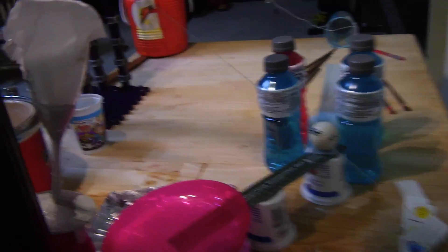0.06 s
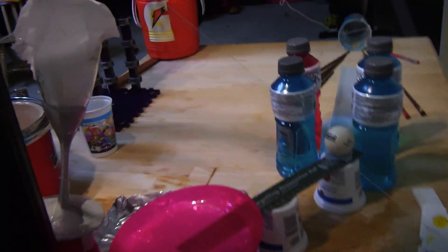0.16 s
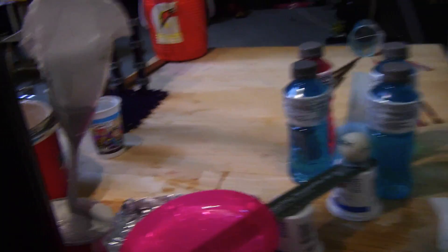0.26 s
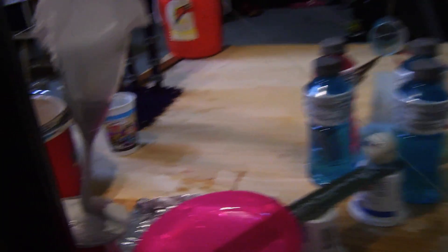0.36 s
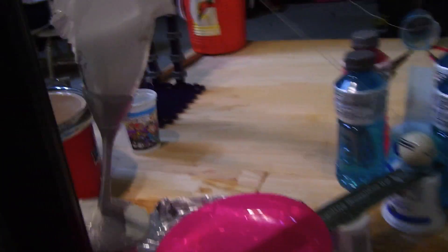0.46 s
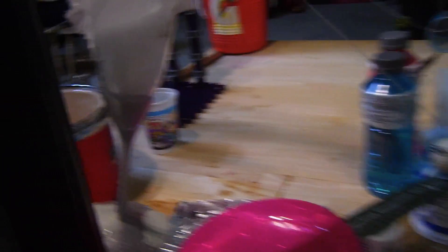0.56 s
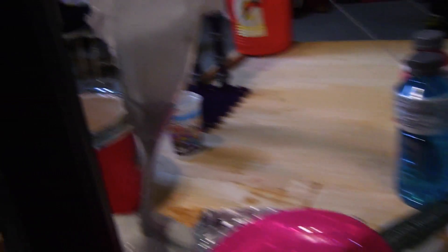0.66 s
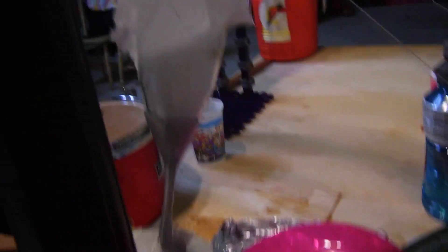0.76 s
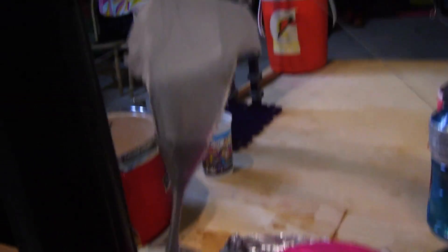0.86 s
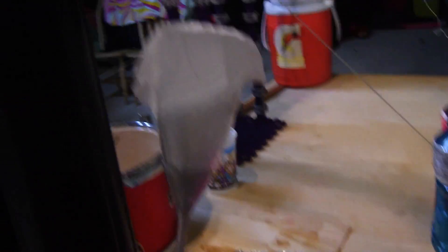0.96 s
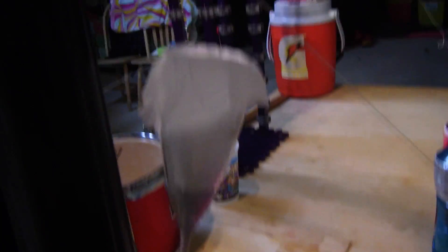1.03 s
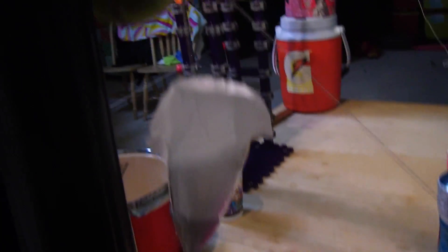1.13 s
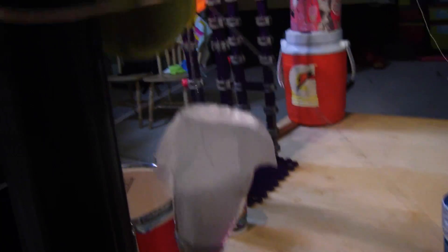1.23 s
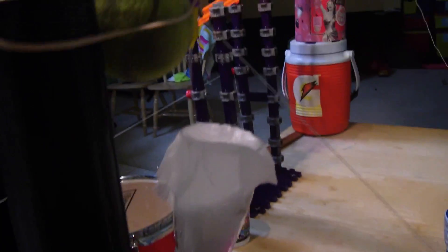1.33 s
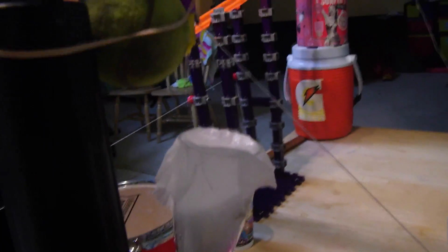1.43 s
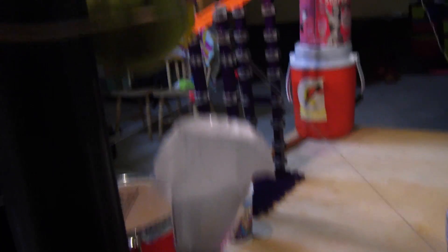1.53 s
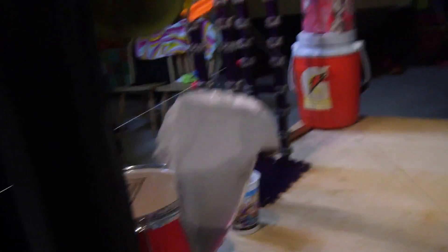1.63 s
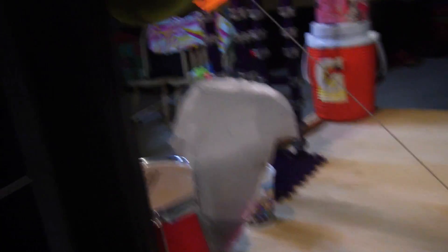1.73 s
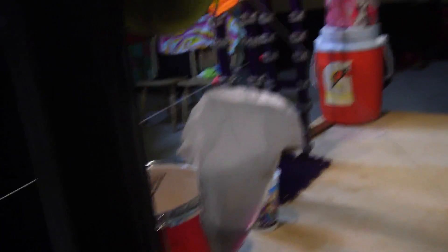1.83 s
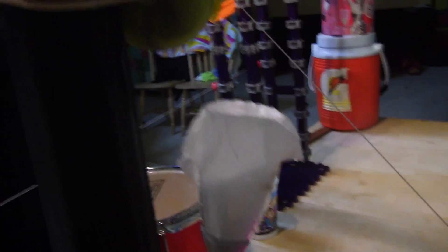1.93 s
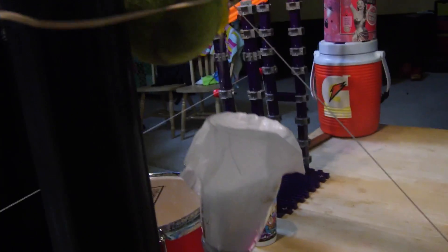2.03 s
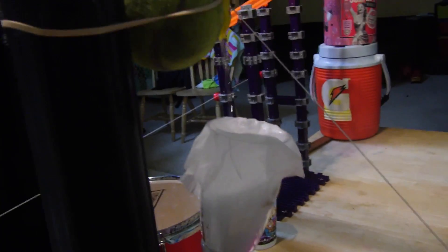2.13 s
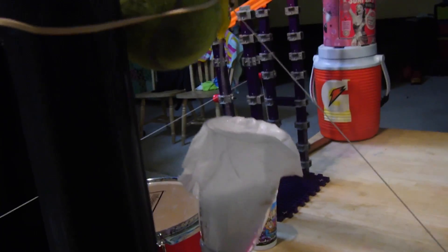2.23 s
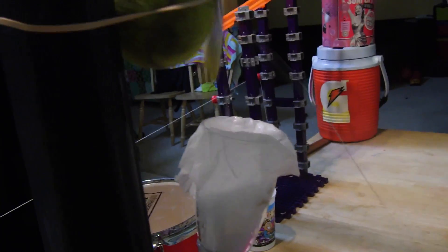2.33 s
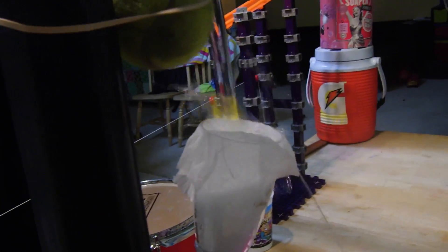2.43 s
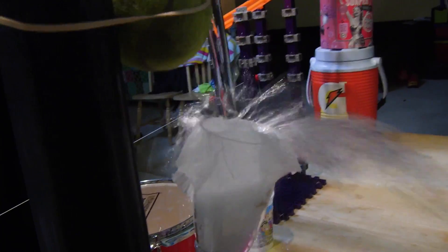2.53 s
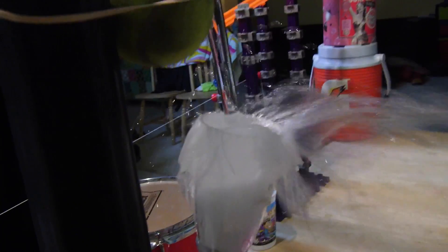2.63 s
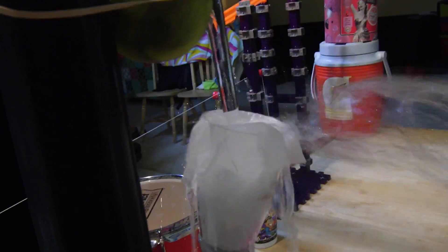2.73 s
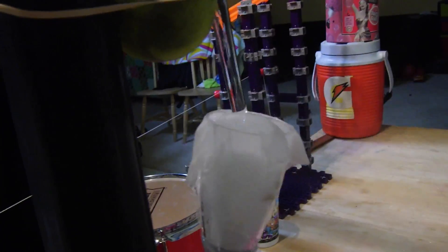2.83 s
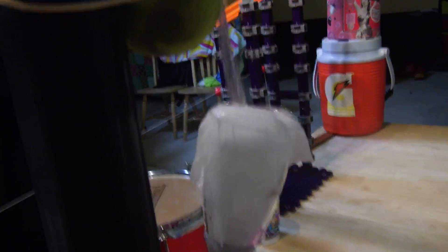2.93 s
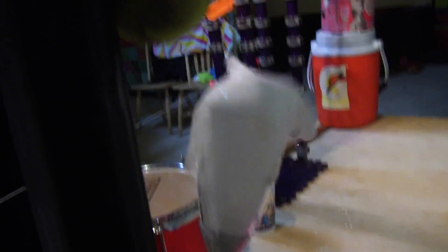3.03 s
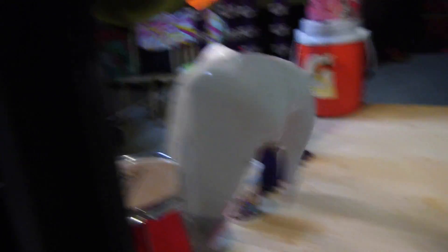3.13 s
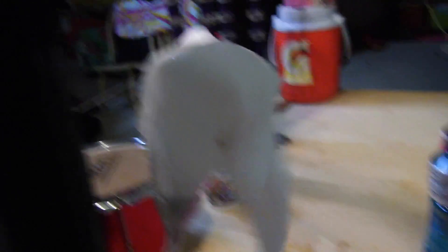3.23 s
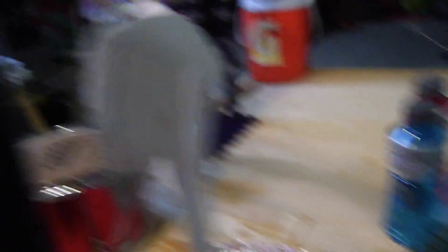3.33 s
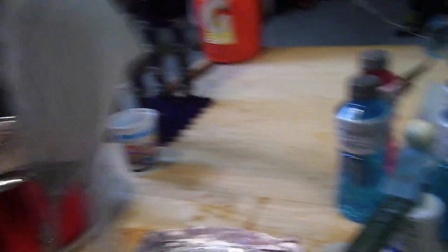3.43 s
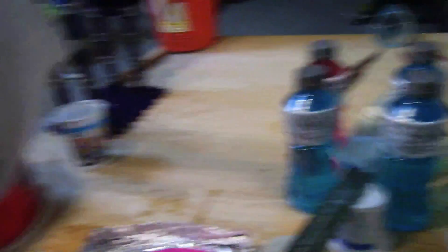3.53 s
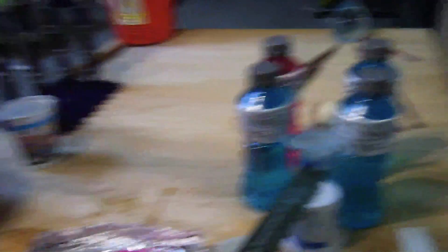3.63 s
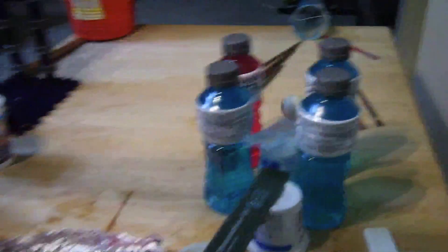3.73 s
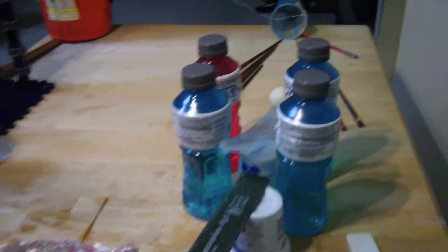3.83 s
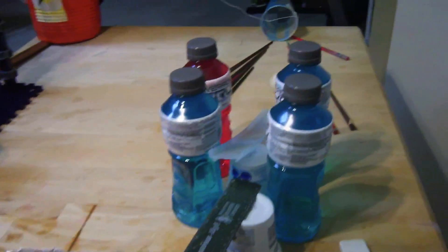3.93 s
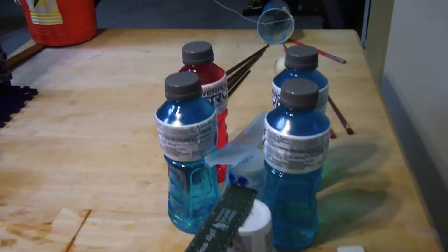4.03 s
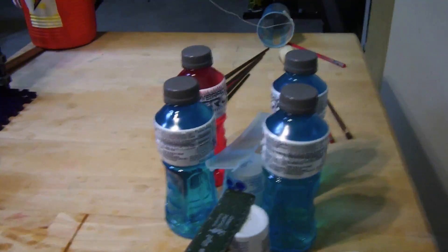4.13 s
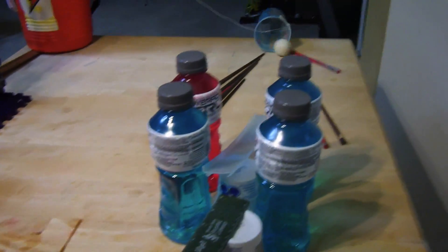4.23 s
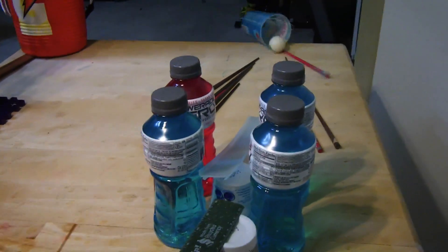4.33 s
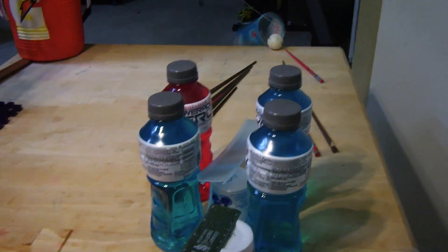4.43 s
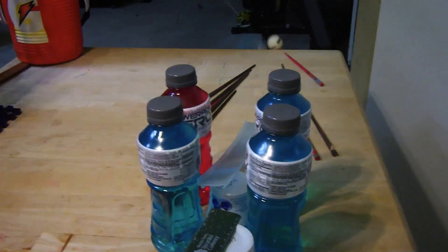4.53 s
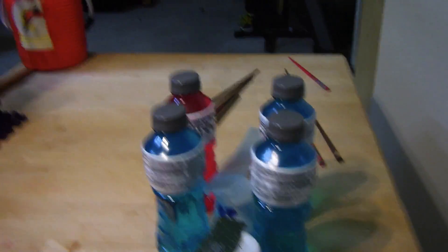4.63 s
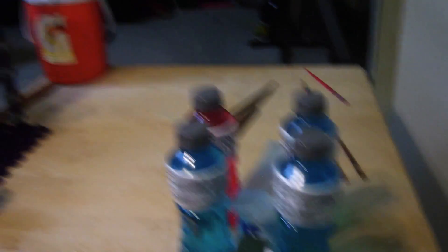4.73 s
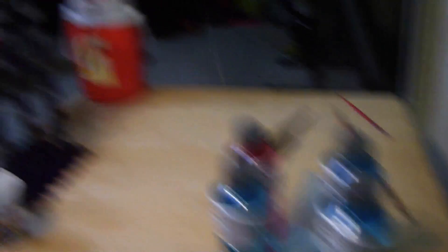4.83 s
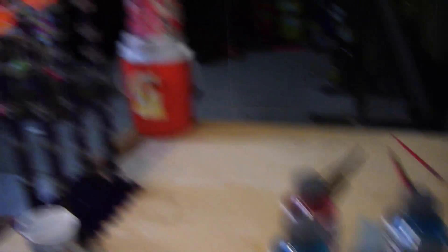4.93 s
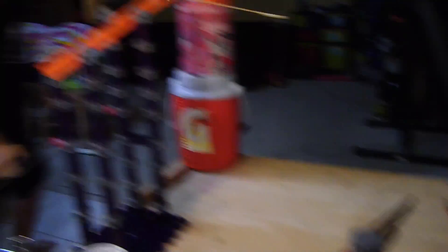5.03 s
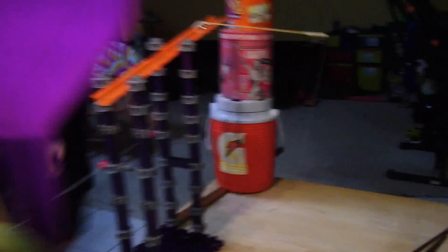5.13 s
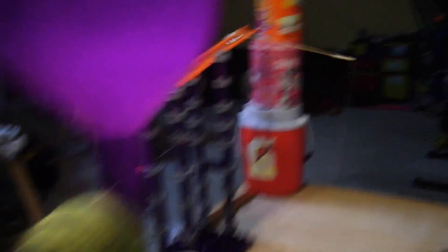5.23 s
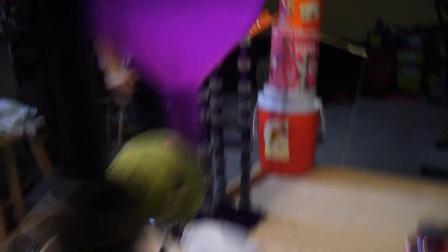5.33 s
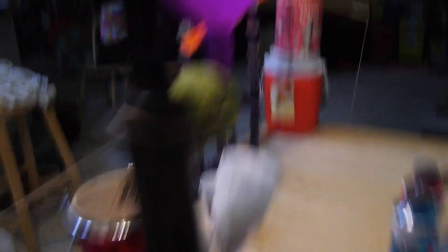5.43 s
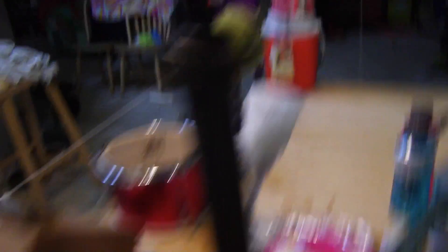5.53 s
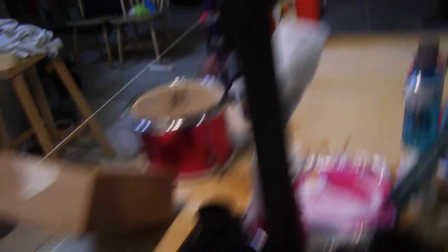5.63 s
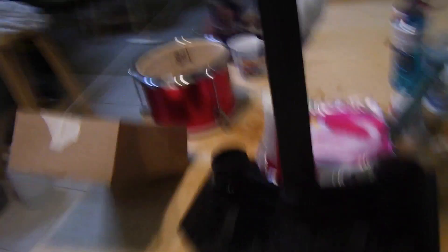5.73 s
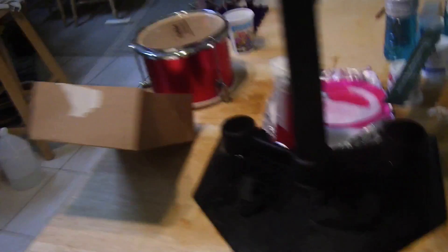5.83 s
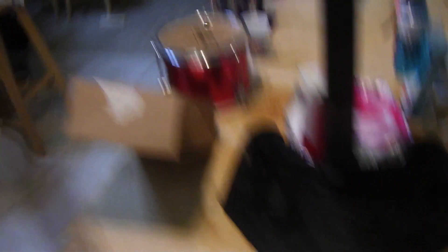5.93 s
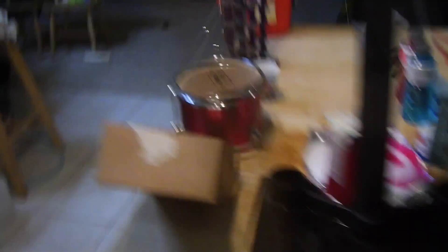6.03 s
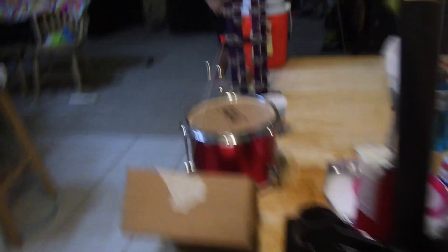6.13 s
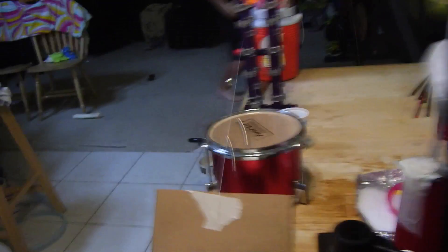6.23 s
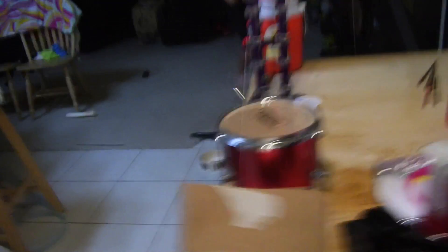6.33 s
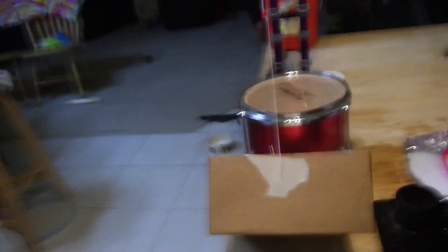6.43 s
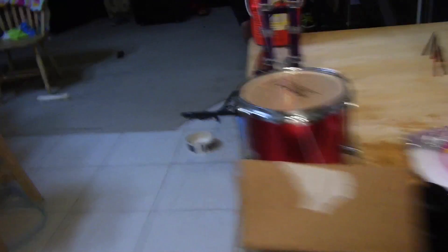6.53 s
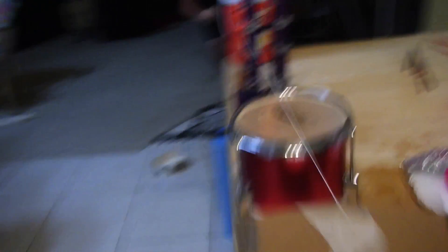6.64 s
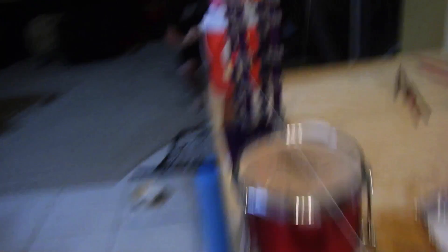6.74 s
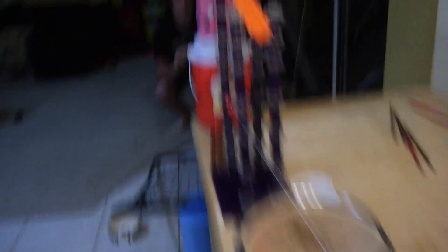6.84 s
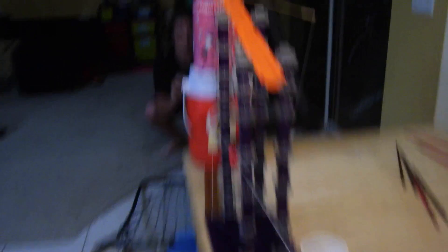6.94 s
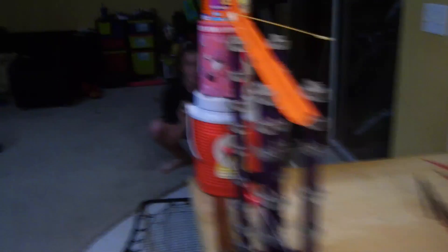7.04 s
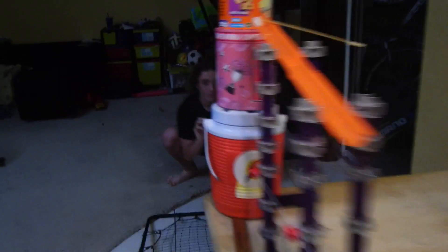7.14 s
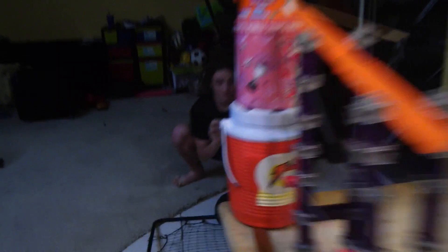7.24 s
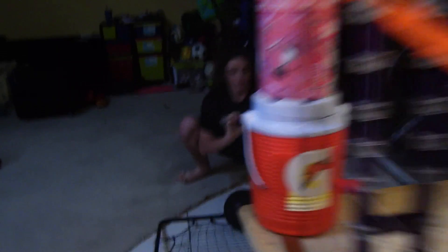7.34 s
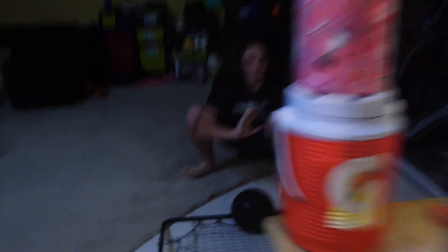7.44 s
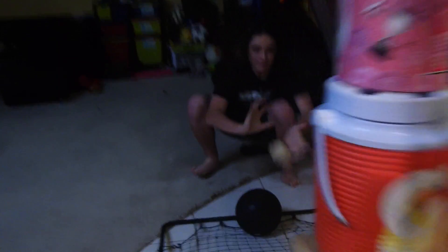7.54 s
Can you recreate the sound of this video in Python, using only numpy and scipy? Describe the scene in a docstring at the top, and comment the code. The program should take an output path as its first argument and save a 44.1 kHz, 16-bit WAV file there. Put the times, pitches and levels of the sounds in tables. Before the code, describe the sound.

Small hard objects tap, clatter and roll over a wooden tabletop indoors, with brief watery blips, then heavier thuds and scattered knocks fade to a faint ring.

```python
"""A chain-reaction machine runs on a plywood table in a large basement room, before a hand-held camera.
Room tone, a faint whine, air hiss and hand rumble (shaped noise, steady sines) are there from the start, with
the first knocks (damped table modes and noise cracks) and a finger bump (a slowing swing). Rolling and
scraping (dense contacts) and ringing parts (decaying sines) join within a second; drips (rising sines) come at
2.5-3.5 s. Knocks crowd from 2.5 s, thuds return at 6 s, then all thins out to a last high metal ring."""
import sys
import numpy as np
from scipy import signal
from scipy.fft import rfft, irfft, next_fast_len
from scipy.io import wavfile

SR = 44100
rng = np.random.default_rng(int(sys.argv[2]) if len(sys.argv) > 2 else 0)


def unload_wav(signal):
    """Save mono or channel-first audio to the path in sys.argv[1] as 16-bit WAV at rate SR, clipped to [-1, 1]."""
    wavfile.write(
        sys.argv[1],
        SR,
        np.round(np.clip(np.atleast_2d(signal).T, -1, 1) * 32767).astype(np.int16),
    )


N = 333837

# modes of the plywood top: mode_hz, level_db
TABLE_MODES = [(405, -1.5), (445, -13.5), (490, 0.5), (560, 4.5), (625, 4), (675, 5.5), (740, 3.5),
               (790, 3), (860, 3.5), (930, 2), (1010, 3), (1120, -0.5), (1200, -8.5), (1340, -11),
               (1500, -12.5), (1800, -4), (2130, -11)]
# spectrum of hard contacts as the microphone housing colours them: frequency_hz, level_db (per Hz)
CONTACT_SPECTRUM = [(120, -16), (300, 5.5), (1250, 3), (1570, 1), (2100, 1.5), (2700, -1), (3500, -8.5),
                    (4600, -5), (5400, -7.5), (6200, -10), (8300, -9.5), (11000, 0.5), (14000, -11),
                    (16000, -24)]


def amp(db):
    """Level definition: 20 dB is a factor of ten in amplitude."""
    return 10 ** (np.asarray(db) / 20)


def rms_one(x):
    """Power normalisation: scale to rms 1."""
    return x / np.sqrt(np.mean(x ** 2) + 1e-20)


def in_time(rows):
    """Linear interpolation: the columns of a time curve at every sample."""
    s, *columns = np.transpose(rows)
    return [np.interp(np.arange(N) / SR, s, column) for column in columns]


def at_hz(points, hz):
    """Logarithmic pitch scale: a spectrum table read on a log-frequency axis."""
    table_hz, values = np.transpose(points)
    return np.interp(np.log(hz), np.log(table_hz), values)


def band(x, low_hz, high_hz):
    """Band-pass filtering with steep Butterworth edges."""
    return signal.sosfilt(signal.butter(3, [low_hz, high_hz], "band", fs=SR, output="sos"), x)


def coloured(x, spectrum):
    """Spectral shaping: noise weighted by a spectrum that falls away outside its table; rms 1."""
    size = next_fast_len(len(x))
    hz = np.maximum(np.arange(size // 2 + 1) * SR / size, 1)
    closed = [(1, -90)] + list(spectrum) + [(SR / 2, -90)]
    return rms_one(irfft(rfft(x, size) * amp(at_hz(closed, hz)), size)[:len(x)])


def drift(rate_hz):
    """Low-pass filtered noise: a slow random wobble of spread 1."""
    steps = rng.standard_normal(N // 100 + 2002)     # one step per 100 samples
    r = np.exp(-200 * np.pi * rate_hz / SR)
    slow = signal.lfilter([1], [1, -2 * r, r * r], steps)[2000:]
    return np.interp(np.arange(N) / 100, np.arange(len(slow)), rms_one(slow))


def add(track, s, sound):
    """Superposition: mix a short sound in at time s."""
    i = max(round(s * SR), 0)
    track[i:i + len(sound)] += sound[:N - i]


def grains(per_s, spread_db):
    """Poisson-like process: random contacts of uneven size and either sign."""
    sizes = amp(spread_db * np.minimum(rng.exponential(1, N), 5)) * rng.choice([-1, 1], N)
    return sizes * (rng.random(N) < per_s / SR)


def background():
    """Stationary noise under slow level curves: room tone with a tonal whine, air hiss, hand rumble."""
    # spectra: frequency_hz, level_db (per Hz)
    room_spectrum, air_spectrum, hand_spectrum = [(120, 0), (200, -2.5), (330, -6.5), (650, 0.5),
                                                  (1000, -6.5), (1550, -11), (2100, -20.5), (3200, -28.5),
                                                  (4600, -71), (5500, -23), (6300, -17.5), (9000, -24),
                                                  (14000, -21), (16000, -13)], [(2500, -0.5), (3300, -2), (3800, -6.5),
                                                                     (4600, -4.5), (5400, -3), (6200, -0.5),
                                                                     (7000, -7.5), (8300, -12.5),
                                                                     (11200, -3), (14000, -13), (16000, 2)], [(12, -27), (25, -1),
                                                                                  (55, 0), (110, -11.5),
                                                                                  (200, -30)]
    # levels of room tone, air hiss and hand rumble on the camera body: time_s, level_db
    room_curve, hiss_curve, grip_curve = [(0, -61.5), (.36, -59), (.95, -51.5), (2.6, -52.5), (3.25, -61),
                                          (4.1, -67), (4.6, -60.5), (5.0, -62), (6.3, -54), (7.57, -60.5)], [(0, -64.5), (.17, -72.5), (.8, -63),
                                                              (2.4, -62), (2.87, -46), (3.1, -60.5),
                                                              (3.25, -55), (3.62, -42), (4.09, -41.5),
                                                              (4.33, -42), (4.36, -46.5), (4.6, -46.5),
                                                              (4.87, -45), (6.03, -45), (6.055, -74),
                                                              (6.2, -68), (6.64, -63), (7.0, -62),
                                                              (7.43, -53), (7.57, -55)], [(0, -38), (.17, -58),
                                                                            (.95, -49), (2.17, -52.5),
                                                                            (2.9, -57.5), (3.62, -56),
                                                                            (4.09, -53), (4.28, -71),
                                                                            (4.72, -57), (5.17, -53.5),
                                                                            (5.37, -48), (5.63, -40),
                                                                            (5.94, -40), (6.2, -63),
                                                                            (6.4, -62.5), (7.3, -55),
                                                                            (7.57, -54)]
    # electronics whine: pitch_hz, level_db (peak, against the room tone's rms), stop_s
    whine_lines = [(7192, -46, 8.0), (9200, -17.5, 2.5), (9232, -30, 2.5)]
    (room_db,), (air_db,), (hand_db,) = in_time(room_curve), in_time(hiss_curve), in_time(grip_curve)
    white = rng.standard_normal((3, N))
    t = np.arange(N) / SR
    whine = sum(amp(db) * np.sin(2 * np.pi * hz * t) * (t < stop) for hz, db, stop in whine_lines)
    room_tone = amp(room_db) * (coloured(white[0], room_spectrum) + whine)
    air = amp(air_db + .6 * drift(12)) * coloured(white[1], air_spectrum)
    hand = amp(hand_db + 1.0 * drift(4)) * coloured(white[2], hand_spectrum)
    return room_tone + air + hand


def blows():
    """Modal excitation: blows ring table modes near their pitch and crack; gives direct sound and room send."""
    # blows: start_s, ring_db, pitch_hz, clack_db, tick_db, sizzle_db, length (times an ordinary blow)
    blow_table = [(0.003, -30, 515, -36.5, -47, -44, 0.6), (0.058, -23.5, 480, -40, -47, -65, 0.54),
                  (0.079, -32, 552, -57, -40.5, -66, 1.1), (0.087, -29, 490, -40.5, -57, -64, 0.69),
                  (0.709, -40.5, 546, -46, -58, -64, 0.95), (0.778, -22.5, 1260, -39, -37, -56, 0.67),
                  (0.791, -26, 710, -35, -41, -60, 1.1), (0.987, -37, 546, -44.5, -63, -62, 0.82),
                  (2.386, -42, 750, -48, -49.5, -56, 3), (2.46, -17.5, 538, -18, -29, -32, 0.86),
                  (2.509, -20, 603, -30, -35, -47, 0.7), (2.515, -41, 595, -49, -30, -39, 2),
                  (2.539, -43, 667, -54, -36.5, -38, 1.8), (2.661, -39, 533, -40, -44, -54, 1.01),
                  (2.673, -25.5, 780, -36, -39, -30, 0.68), (2.695, -32, 770, -37, -30.5, -31.5, 2),
                  (2.704, -34, 715, -35, -22, -27, 0.98), (2.727, -16, 735, -24, -25.5, -29, 0.98),
                  (2.735, -28, 641, -37, -26, -29.5, 0.79), (2.743, -27, 805, -54, -36, -38, 1.3),
                  (2.771, -24.5, 680, -52, -53, -53, 1.01), (2.83, -8.5, 726, -19.5, -29, -36, 0.82),
                  (2.85, -15, 656, -23, -27.5, -35, 0.97), (2.879, -17.5, 730, -30, -33, -40, 1.17),
                  (2.903, -29, 794, -36, -31.5, -35, 3), (2.941, -40, 759, -39, -33.5, -47, 3),
                  (2.96, -20, 775, -32, -26.5, -38, 1.6), (2.977, -24.5, 842, -40, -36, -52, 0.85),
                  (3.003, -21, 720, -54, -42, -59, 0.77), (3.057, -13, 705, -24.5, -27, -43, 0.61),
                  (3.102, -37, 740, -35, -37, -62, 0.77), (3.118, -32, 641, -47, -51, -55, 1.01),
                  (3.143, -31, 675, -53, -47, -44, 0.77), (3.231, -46, 630, -47, -46, -48, 2.5),
                  (3.456, -39, 1150, -47, -45, -54, 2.2), (3.677, -9.5, 860, -25.5, -32.5, -42, 1.12),
                  (3.693, -25.5, 845, -47, -43, -49, 1.6), (3.723, -23.5, 890, -50, -51, -48, 1.3),
                  (3.761, -20.5, 830, -40, -49, -51, 1.55), (3.823, -21, 860, -49, -33, -46, 0.75),
                  (3.854, -26.5, 890, -49, -48, -44, 1.7), (3.873, -25.5, 700, -53, -42, -39, 2.8),
                  (3.97, -3.5, 720, -36, -37, -40, 1.18), (4.017, -9, 720, -50, -45, -52, 1.1),
                  (4.044, -12, 710, -46, -55, -56, 1.01), (4.078, -14.5, 654, -49, -56, -47, 1.01),
                  (4.098, -15, 643, -51, -52, -46, 0.93), (4.123, -15.5, 689, -47, -51, -40, 0.92),
                  (4.145, -17.5, 667, -38, -47, -41, 2.9), (4.183, -13.5, 700, -38, -40, -39, 1.35),
                  (4.211, -34, 627, -29, -27.5, -20.5, 1.9), (4.249, -18, 710, -47, -42, -36, 1.9),
                  (4.277, -15, 610, -31.5, -35, -38, 1.2), (4.303, -16, 589, -34, -48, -38, 0.85),
                  (4.333, -6.5, 400, -25.5, -28.5, -31.5, 1.16), (4.383, -28, 657, -34, -37.5, -53, 1.5),
                  (4.461, -28.5, 646, -29, -27.5, -33, 1.28), (4.488, -21.5, 644, -54, -50, -52, 0.88),
                  (4.503, -27, 646, -32, -36, -52, 1.1), (4.533, -27.5, 706, -40, -41, -51, 1.8),
                  (4.553, -26, 630, -57, -51, -45, 0.95), (4.772, -31.5, 557, -60, -51, -49, 0.78),
                  (4.994, -28.5, 765, -25.5, -25, -31, 1.15), (5.004, -21, 770, -19, -19.5, -40, 0.51),
                  (5.37, -36.5, 840, -41, -43, -54, 1.2), (5.388, -26.5, 590, -30, -37, -52, 0.67),
                  (5.615, -24.5, 704, -32, -34, -42, 0.88), (5.657, -23, 715, -24, -36, -36, 1.26),
                  (5.68, -37, 595, -37, -24.5, -32, 1.01), (5.689, -22, 786, -19, -23.5, -28, 0.78),
                  (5.728, -29, 1010, -44, -31, -40, 1.1), (5.789, -31, 775, -30, -35, -41, 2.1),
                  (5.818, -35, 670, -29, -46, -42, 1.4), (5.874, -36, 697, -33, -56, -47, 0.95),
                  (6.034, -14, 581, -22, -23, -19.5, 0.96), (6.042, -8, 500, -17.5, -49, -54, 1.2),
                  (6.052, -10, 610, -23, -52, -40, 0.83), (6.079, -16, 790, -21.5, -50, -49, 1.2),
                  (6.084, -9.5, 463, -17.5, -26, -55, 0.66), (6.095, -11, 620, -25.5, -52, -57, 1.5),
                  (6.128, -19, 611, -23, -46, -64, 0.79), (6.207, -5, 550, -16, -25.5, -32, 0.83),
                  (6.22, -42, 600, -18, -71, -46, 0.59), (6.275, -24, 710, -38, -41, -48, 0.87),
                  (6.431, -10, 487, -21.5, -26, -39, 1.2), (6.438, -10, 730, -17.5, -25, -30, 0.72),
                  (6.461, -10.5, 630, -18.5, -26, -38, 1.36), (6.476, -13, 724, -28, -56, -41, 0.75),
                  (6.493, -24, 670, -47, -49, -60, 1.2), (6.516, -23.5, 680, -34, -40, -57, 1.8),
                  (6.586, -16.5, 446, -21, -26.5, -38, 1.4), (6.596, -18.5, 696, -31, -49, -53, 0.68),
                  (6.648, -22.5, 641, -35, -42, -58, 0.89), (6.672, -22, 790, -41, -50, -67, 1.01),
                  (6.686, -14, 835, -22.5, -43, -64, 0.76), (6.705, -23, 622, -53, -44, -62, 0.71),
                  (6.782, -25, 800, -37, -38, -52, 1.2), (6.842, -21.5, 666, -30.5, -40, -55, 1.35),
                  (6.867, -17, 780, -26.5, -34.5, -47, 1.07), (6.876, -16.5, 730, -38, -40, -45, 0.86),
                  (6.923, -45, 611, -47, -49, -57, 0.72), (6.96, -30.5, 744, -34.5, -41.5, -61, 1.1),
                  (6.973, -28.5, 554, -50, -44, -64, 0.74), (7.045, -31, 754, -36.5, -39.5, -65, 1.15),
                  (7.062, -31, 732, -46, -50, -61, 0.86), (7.113, -32, 740, -38, -45, -61, 0.79),
                  (7.13, -35, 720, -44, -48, -64, 1.1), (7.203, -38, 814, -44, -49, -51, 1.3),
                  (7.212, -39, 670, -39, -36, -49, 1.26), (7.453, -46, 611, -52, -51, -58, 1.01),
                  (7.468, -43, 1040, -51, -43, -57, 1.01), (7.488, -41.5, 606, -45.5, -49, -58, 1.2)]
    # deep thuds: heavy things landing, and at the very start a thump as the camera is handled: start_s,
    # level_db
    heavy_table = [(0.003, -33), (0.058, -32), (6.035, -13), (6.045, -14), (6.084, -12), (6.098, -16),
                   (6.13, -19), (6.219, -13.5), (6.588, -27)]
    # hard parts snapping far across the room, heard only by way of the walls: start_s, clack_db, tick_db
    far_table = [(0.782, -26.5, -34.5), (3.23, -54, -41), (4.998, -37, -35), (5.685, -38, -25),
                 (6.276, -32, -35.5), (6.786, -41, -36.5), (7.21, -39, -31.5), (7.46, -55, -47)]
    # the camera against the action: time_s, distance_m
    distance_curve = [(0, 0.17), (.8, 0.72), (2.45, 0.56), (3.2, 1), (3.95, 0.94), (4.6, 1.6), (5.7, 2),
                      (6.1, 1.66), (6.5, 0.58), (7.57, 2.14)]
    ring_t60_s, crack_t60_s, ring_attack_s = 0.048, 0.032, .001
    send_at_1m_db = -11     # ahead of the room's own return gain
    t = np.arange(round(.2 * SR)) / SR
    hz, mode_db = np.transpose(TABLE_MODES)[:, :, None]
    direct, send = np.zeros(N), np.zeros(N)

    # a crack is a quick spray of tiny contacts in four bands: thud, clack, tick, sizzle
    splinter = coloured(grains(5000, spread_db=3.0), CONTACT_SPECTRUM)
    edges_hz = [(160, 340), (1000, 3200), (3200, 7100), (7100, 16000)]
    cracks = np.array([rms_one(band(splinter, *edges)) for edges in edges_hz])
    lasting_s = crack_t60_s * np.array([[2.2], [1.1], [.8], [.45]])           # lows die later
    rise = 1 - np.exp(-t / np.array([[.002], [.0007], [.0004], [.0002]]))     # highs start first

    def spray_at(place, length):
        """Energy normalisation: a piece of the spray whose energy follows from its decay alone."""
        start = int(place * (N - len(t)))
        fade = amp(-60 * t / (lasting_s * length))
        spray = cracks[:, start:start + len(t)] * fade
        gain = np.sqrt(np.sum(fade ** 2, axis=1) / np.sum(spray ** 2, axis=1))
        return spray * rise * gain[:, None]

    no_bass = signal.butter(2, 340, "high", fs=SR, output="sos")     # a thin board radiates no bass
    chance = rng.random((len(blow_table), 2, len(TABLE_MODES) + 1, 1))
    for (s, ring_db, pitch_hz, *crack_db, length), (luck, load) in zip(blow_table, chance):
        metres = np.interp(s, *np.transpose(distance_curve))
        # modes far from the pitch of the struck spot are excited less
        share = amp(mode_db - 22.5 * np.abs(np.log2(hz / pitch_hz)) + 9.9 * (luck[1:] - .5))
        shifted_hz = hz * (1 + 0.071 * (load[1:] - .5))     # each struck object differs a little, so the modes shift slightly
        modes = share * np.sin(2 * np.pi * shifted_hz * t + 2.0 * luck[1:])     # start nearly in step
        tone = np.sum(modes, axis=0) / np.sqrt(np.sum(share ** 2))
        decay = amp(-60 * (t / (ring_t60_s * length)) ** 1.39)     # the contact damps them ever faster
        ring = amp(ring_db) * tone * decay * (1 - np.exp(-t / ring_attack_s))
        ring = signal.sosfilt(no_bass, ring)
        spray = amp(crack_db)[:, None] * spray_at(luck[0, 0], length)[1:]
        add(direct, s, ring + np.sum(spray, axis=0))
        # the clack carries best into the room; the send grows with distance
        add(send, s, amp(send_at_1m_db) * metres * (ring + amp([3, 1.5, -5]) @ spray))
    for (s, db), place in zip(heavy_table, rng.random(len(heavy_table))):
        thud = amp(db) * spray_at(place, 0.69)[0]
        add(direct, s, thud)
        add(send, s, amp(send_at_1m_db) * thud)
    for (s, clack_db, tick_db), place in zip(far_table, rng.random(len(far_table))):
        levels_db = [clack_db, tick_db, tick_db - 9]     # the sizzle follows the tick
        add(send, s, amp(levels_db) @ spray_at(place, 0.95)[1:])
    return direct, send


def room(x):
    """Diffuse reverberation: half-octave noise bands, each dying exponentially at its own rate."""
    # reverberation time: frequency_hz, t60_s
    room_t60 = [(150, 0.24), (700, 0.63), (2000, 0.31), (5000, 0.16), (12000, 0.19)]
    t = np.arange(round(.8 * SR)) / SR
    tail = np.zeros(len(t))
    edges_hz = 110 * 2 ** np.arange(0, 7.6, .5)
    for low, high in zip(edges_hz, edges_hz[1:]):
        fade = amp(-60 * t / at_hz(room_t60, np.sqrt(low * high)))
        tail += band(rng.standard_normal(len(t)), low, high) * fade
    tail *= 1 - np.exp(-t / 0.00067)
    tail /= np.sqrt(np.sum(tail ** 2) * 2 / np.pi)     # energy pi / 2
    return signal.fftconvolve(x, tail)[:N]


def bumps():
    """Damped oscillation: a finger jolts the camera, a sharp move and then a slower swing back."""
    # finger bumps: start_s, level_db (ahead of the decay), swing_s (the first full turn), way (+1 push, -1 pull)
    bump_table = [(.004, -16, 0.0092, 1), (0.709, -36, 0.0099, -1), (3.12, -32, 0.013, -1),
                  (3.75, -33.5, 0.027, -1), (4.772, -18.5, 0.0096, -1), (5.161, -29, 0.03, -1),
                  (5.841, -12, 0.012, -1)]
    out, t = np.zeros(N), np.arange(round(.1 * SR)) / SR
    for s, db, swing_s, way in bump_table:
        turns = (t / swing_s) ** 0.56       # the swing slows down
        envelope = np.exp(-1.4 * t / swing_s) * (1 - np.exp(-t / 0.0018))
        add(out, s, np.sign(way) * amp(db) * np.sin(2 * np.pi * turns) * envelope)
    return out


def rolling():
    """Random excitation of resonators: dense contacts shake all table modes; the scrape is a brighter band."""
    # rolling and sliding: time_s, rumble_db, scrape_db
    roll_curve = [(0.76, -66, -70), (0.8, -60, -45.5), (0.98, -70, -60.5), (1.27, -64, -106),
                  (2.44, -72, -74), (2.86, -46, -41.5), (3.13, -43.5, -53), (3.26, -62.5, -78),
                  (3.63, -52, -52), (3.86, -43.5, -46.5), (4.16, -32.5, -55), (4.54, -48.5, -58),
                  (4.62, -54, -55), (5.39, -45.5, -48), (5.73, -36.5, -36.5), (6.0, -43.5, -45),
                  (6.08, -35, -40.5), (6.21, -33, -48.5), (6.44, -42, -56.5), (6.71, -38.5, -65),
                  (6.8, -49, -53), (7.24, -55.5, -58.5), (7.57, -55.5, -57)]
    rumble_db, scrape_db = in_time(roll_curve)
    rumble = np.zeros(N)
    clumps = amp(2.2 * drift(30))
    contacts = [grains(500, spread_db=3.5) for _ in TABLE_MODES]
    r = amp(-60 / (.09 * SR))     # each mode dies by 60 dB in 0.09 s
    for (hz, mode_db), hits in zip(TABLE_MODES, contacts):
        w = 2 * np.pi * hz / SR
        resonator = [0, np.sin(w)], [1, -2 * r * np.cos(w), r * r]
        rumble += amp(mode_db) * signal.lfilter(*resonator, clumps * hits)
    scrape = band(coloured(grains(3000, spread_db=2.0), CONTACT_SPECTRUM), 1250, 4900) * np.sqrt(clumps)
    moving = np.clip((np.arange(N) / SR - roll_curve[0][0]) * 20, 0, 1)     # fades in over 0.05 s
    return moving * (amp(rumble_db) * rms_one(rumble) + amp(scrape_db) * rms_one(scrape))


def ringing_parts():
    """Free vibration: a hollow cup and small metal parts each ring on one exponentially decaying line."""
    # rings: start_s, pitch_hz, level_db, t60_s
    ping_table = [(0.785, 1724, -38.5, 0.47), (3.022, 4360, -47.5, 0.3), (4.334, 406.6, -23, 0.23),
                  (7.48, 13900, -56, .2), (7.48, 11400, -67, .25)]
    out, t = np.zeros(N), np.arange(round(.4 * SR)) / SR
    for s, hz, db, t60 in ping_table:
        envelope = amp(-60 * t / t60) * (1 - np.exp(-t / 0.0026))
        add(out, s, amp(db) * np.sin(2 * np.pi * hz * t) * envelope)
    return out


def drips():
    """Frequency-swept resonance: each water drip rises in pitch and dies fast."""
    # drips: start_s, level_db (ahead of the envelope), pitch_hz (at the start)
    drip_table = [(2.537, -24, 3010), (2.545, -30, 2480), (2.555, -30, 2800), (3.252, -36, 1080),
                  (3.342, -32.5, 1110), (3.384, -46, 1146), (3.425, -37, 1080), (3.461, -48, 1020),
                  (3.53, -27, 706)]
    out, t = np.zeros(N), np.arange(round(.4 * SR)) / SR
    for s, db, hz in drip_table:
        envelope = amp(-60 * t / 0.025) * (1 - np.exp(-t / 0.00059))
        add(out, s, amp(db) * np.sin(2 * np.pi * hz * t * (1 + 1.9 * t)) * envelope)
    return out


def scene():
    """Superposition: all sources and the room's return add at the microphone."""
    direct, send = blows()
    near = rolling() + ringing_parts() + drips()
    return (direct + near + amp(-3.5) * room(send) + bumps() + background())[None]


def record(dry):
    """Transduction: port resonances, notches, treble roll-off of softly rounded peaks, and a top cut."""
    # resonances of the microphone port: centre_hz, width_hz, lift_db
    port = [(1542, 134, 9), (4530, 700, 10)]
    # narrow notch filters: centre_hz, width_hz
    notches = [(3192, 675), (4075, 336), (5121, 570), (5670, 700), (7132, 220), (8183, 110)]
    x = dry
    for hz, width_hz, lift_db in port:
        x = x + (amp(lift_db) - 1) * signal.lfilter(*signal.iirpeak(hz, hz / width_hz, SR), x)
    for hz, width_hz in notches:
        x = signal.lfilter(*signal.iirnotch(hz, hz / width_hz, SR), x)
    rounded = 0.64 * np.tanh(x / 0.77)
    x = signal.sosfilt(signal.butter(7, 14350, fs=SR, output="sos"), rounded)
    return signal.sosfilt(signal.cheby2(12, 70, 15650, fs=SR, output="sos"), x)


dry = scene()
out = record(dry)
unload_wav(out)
```